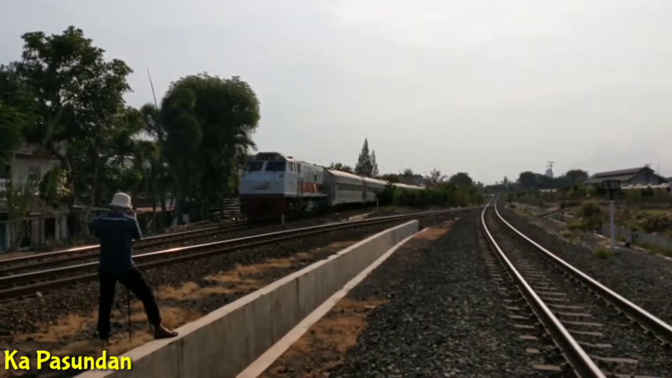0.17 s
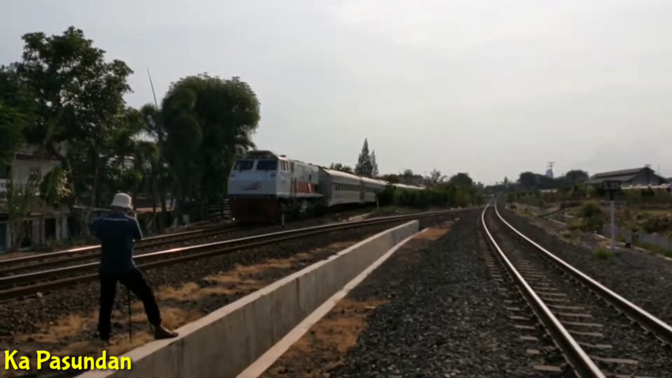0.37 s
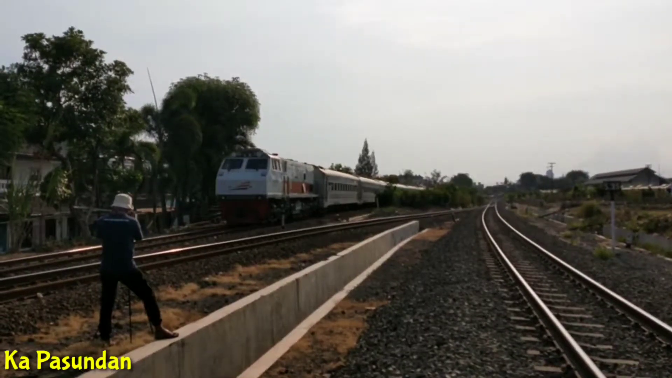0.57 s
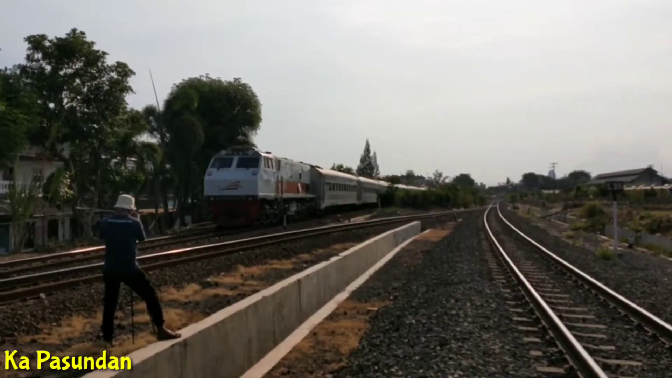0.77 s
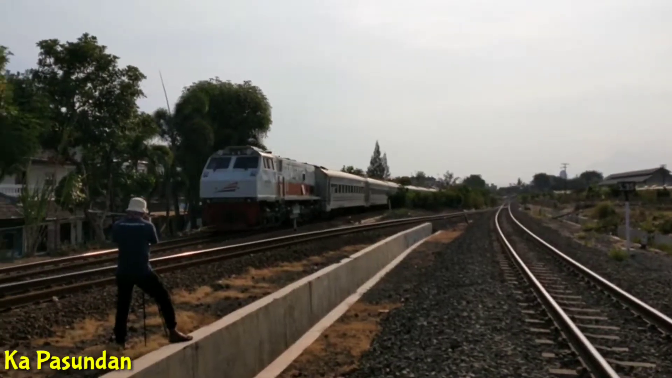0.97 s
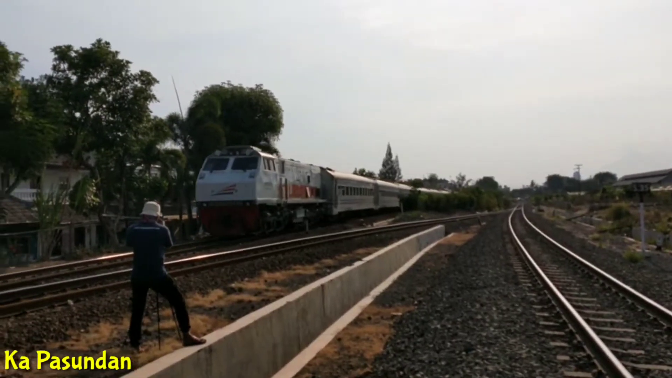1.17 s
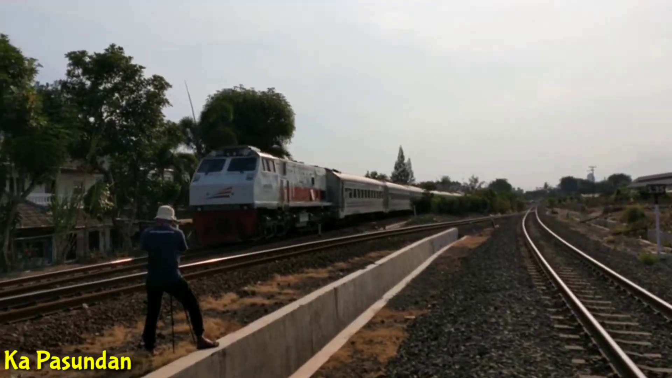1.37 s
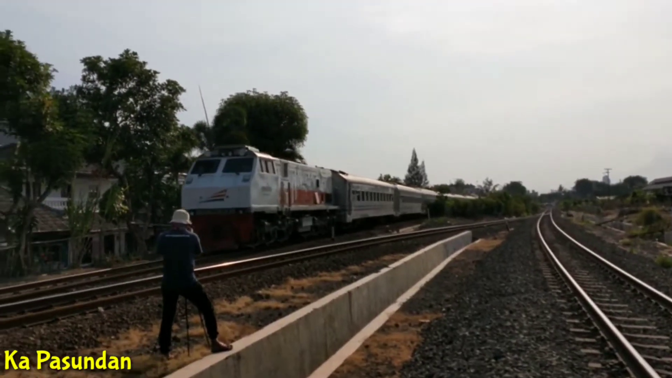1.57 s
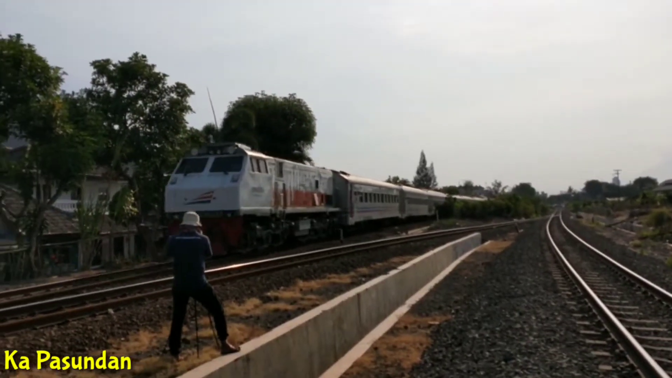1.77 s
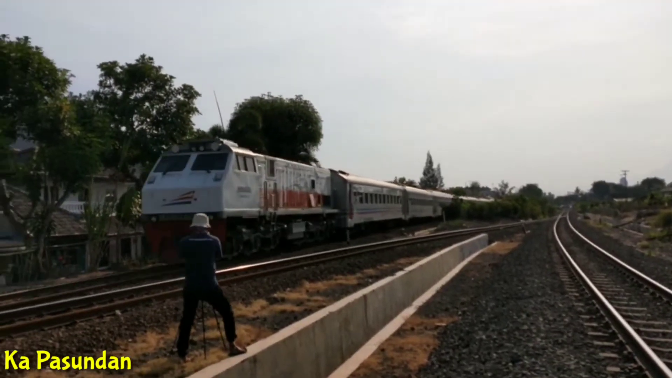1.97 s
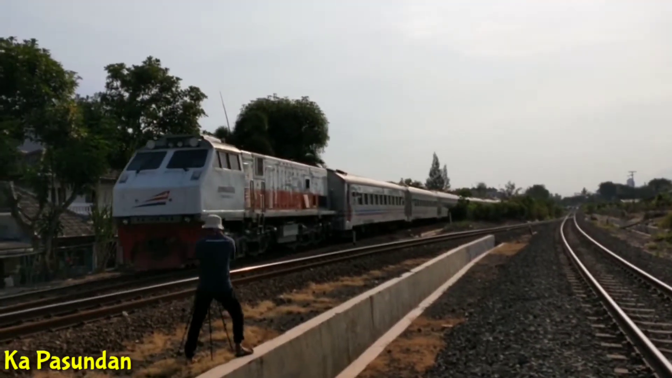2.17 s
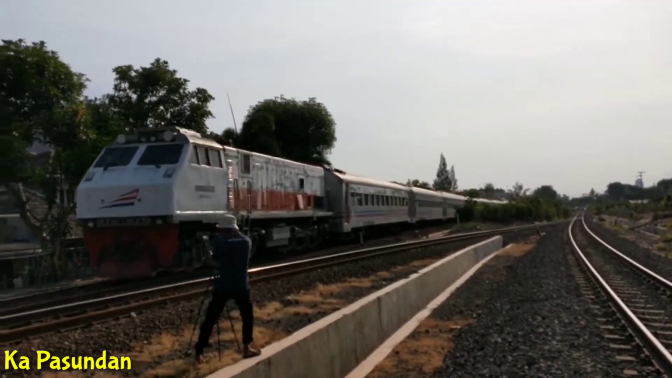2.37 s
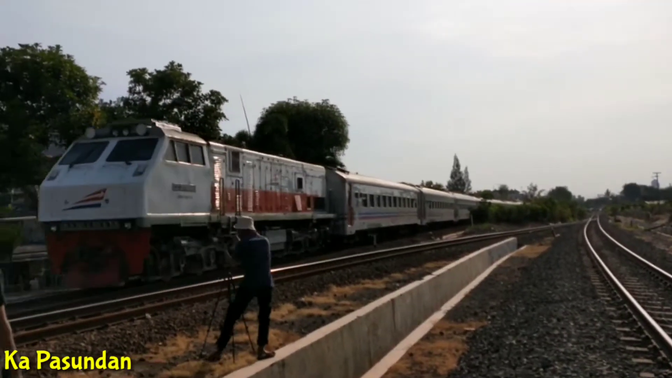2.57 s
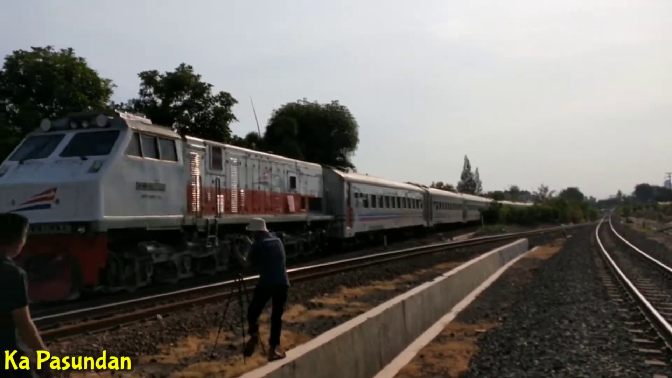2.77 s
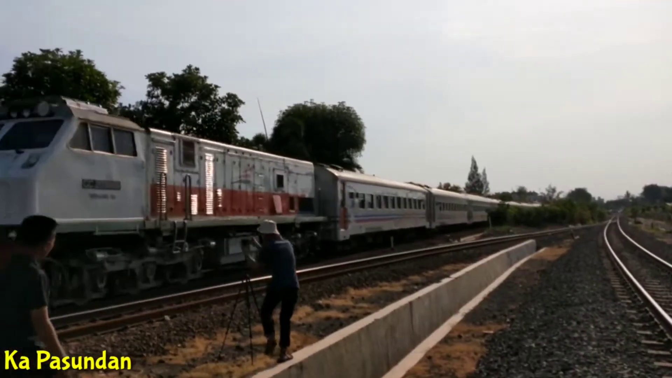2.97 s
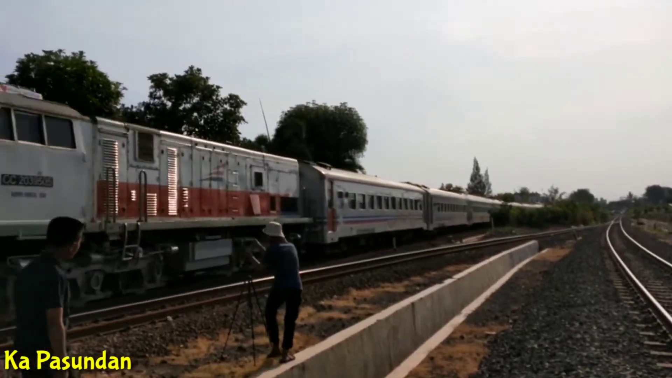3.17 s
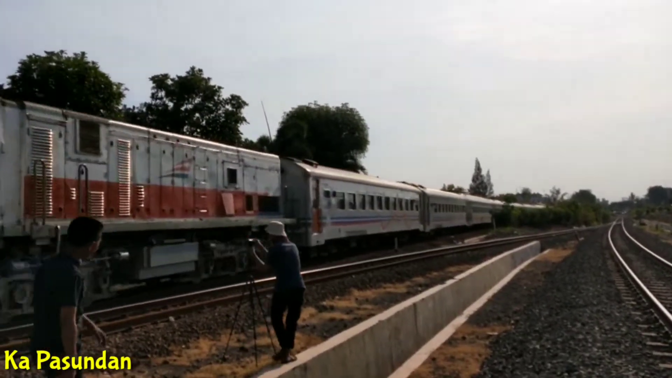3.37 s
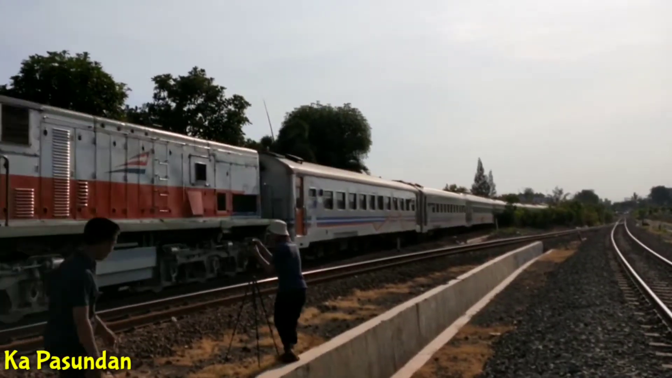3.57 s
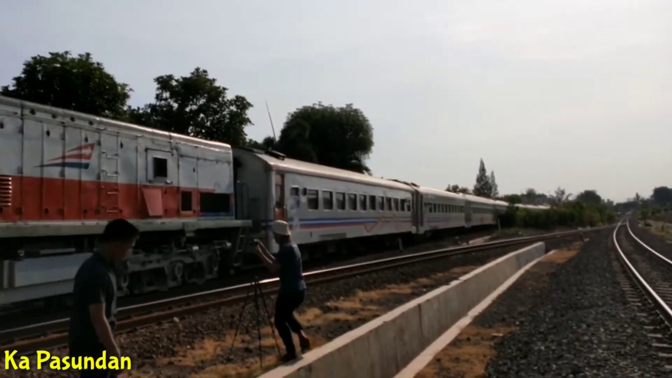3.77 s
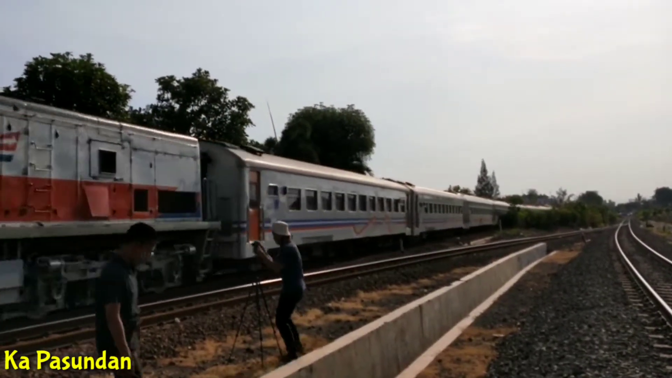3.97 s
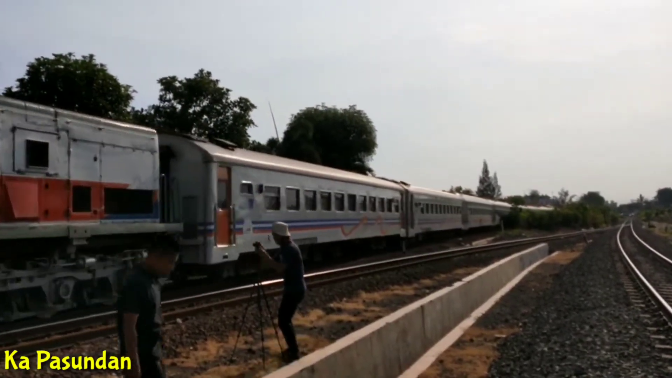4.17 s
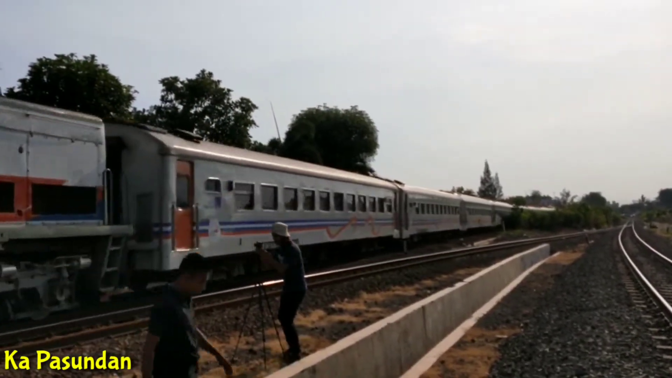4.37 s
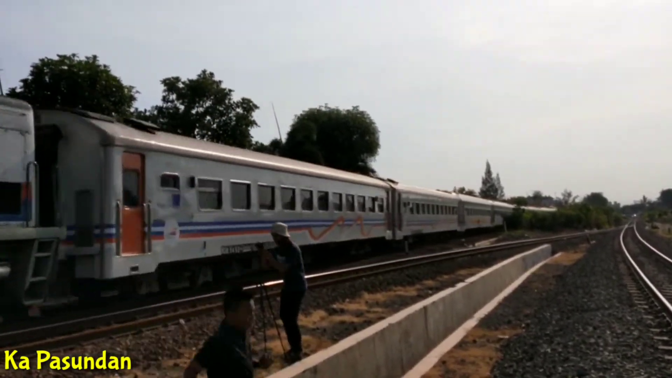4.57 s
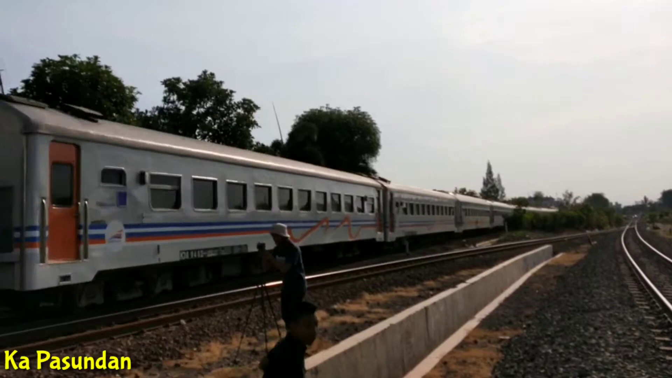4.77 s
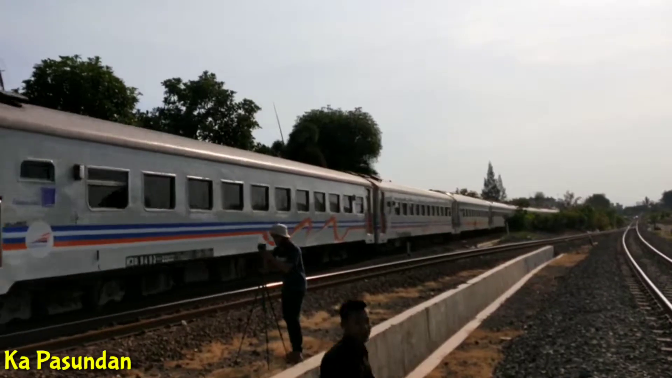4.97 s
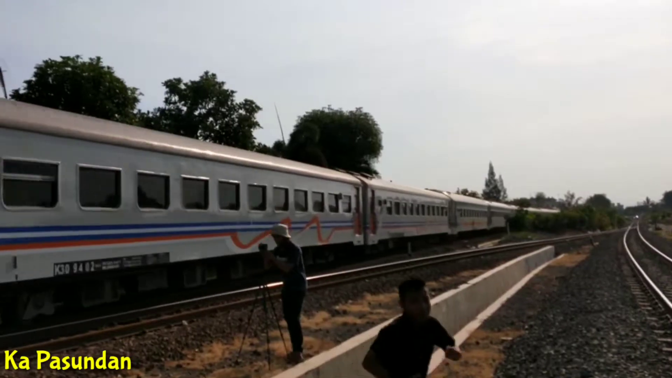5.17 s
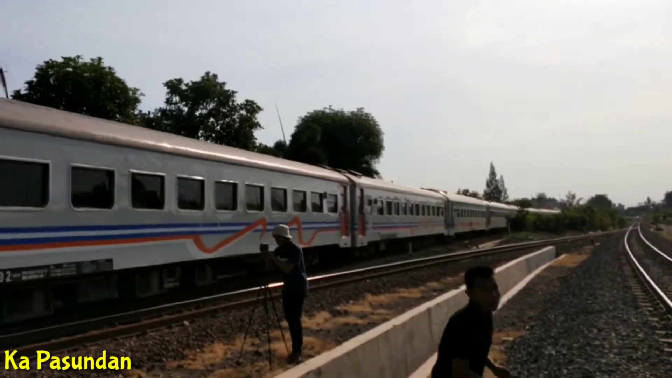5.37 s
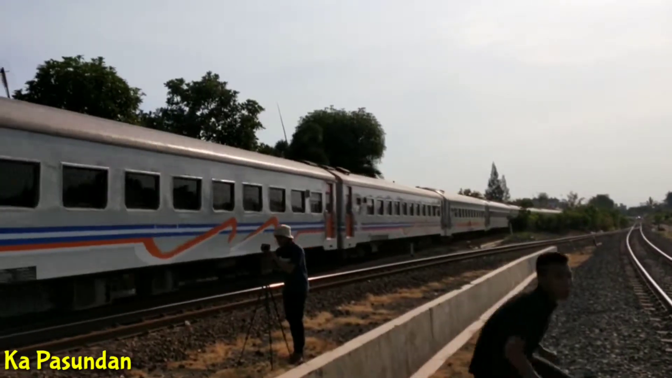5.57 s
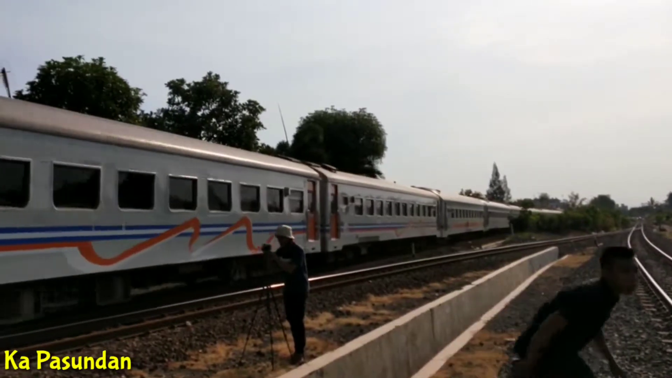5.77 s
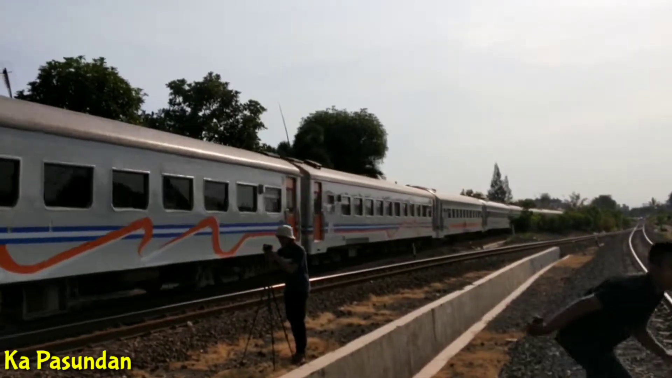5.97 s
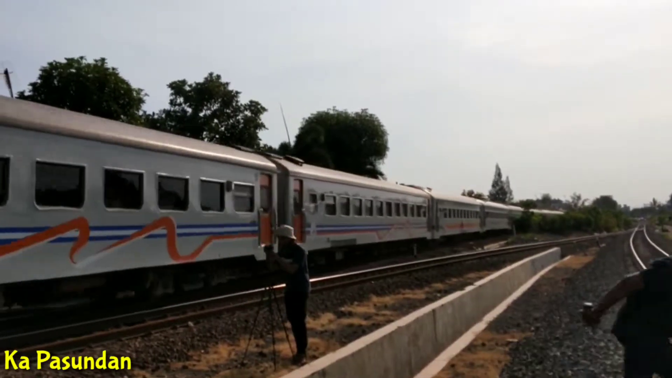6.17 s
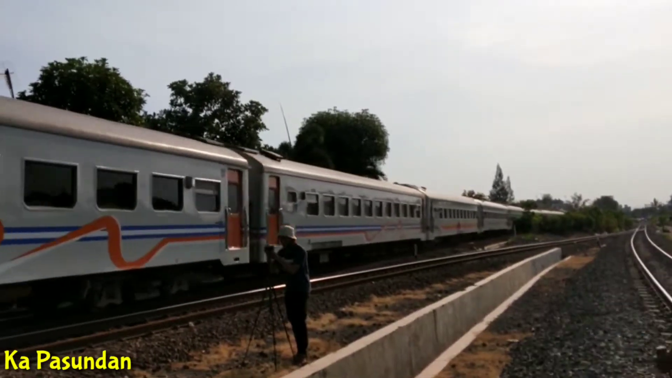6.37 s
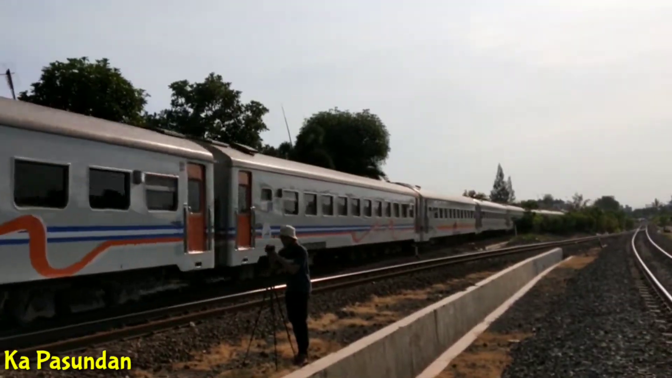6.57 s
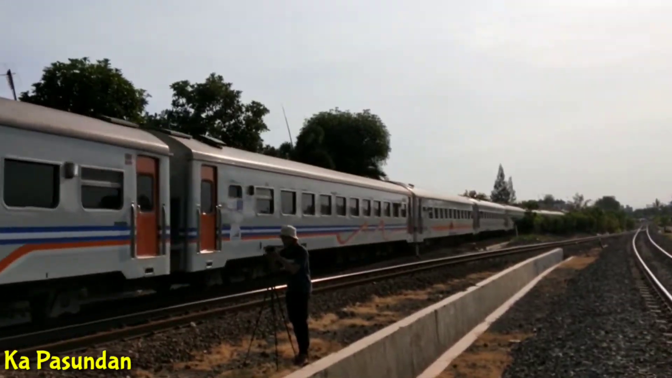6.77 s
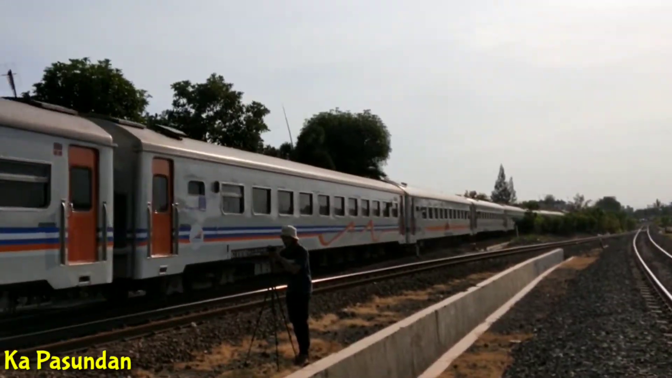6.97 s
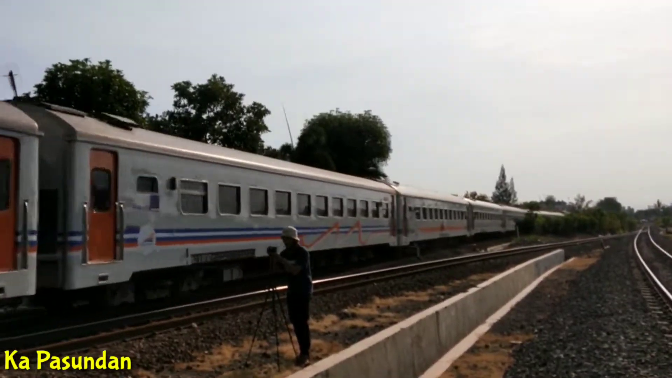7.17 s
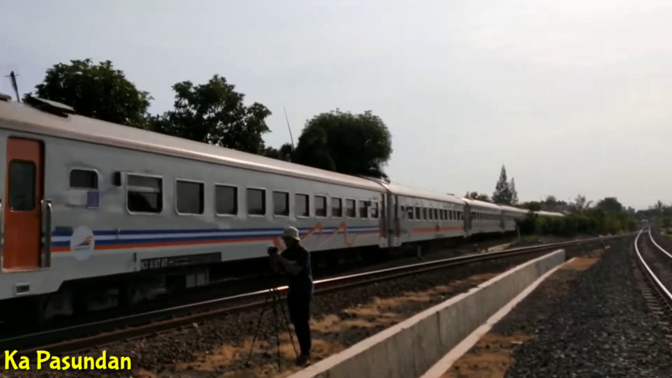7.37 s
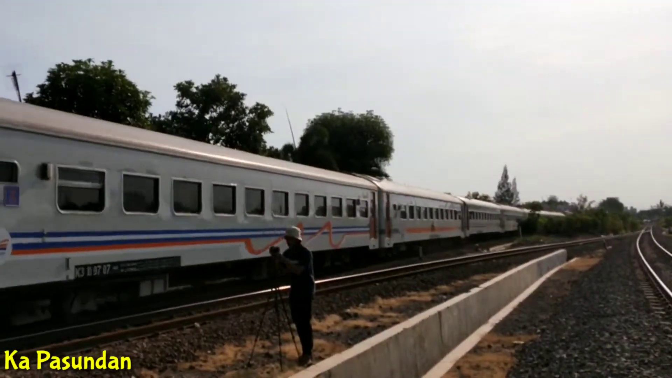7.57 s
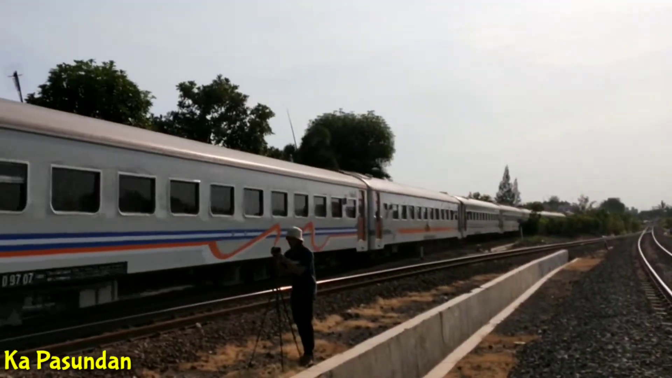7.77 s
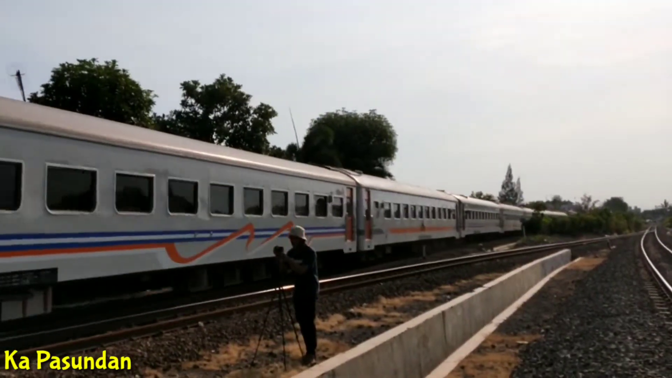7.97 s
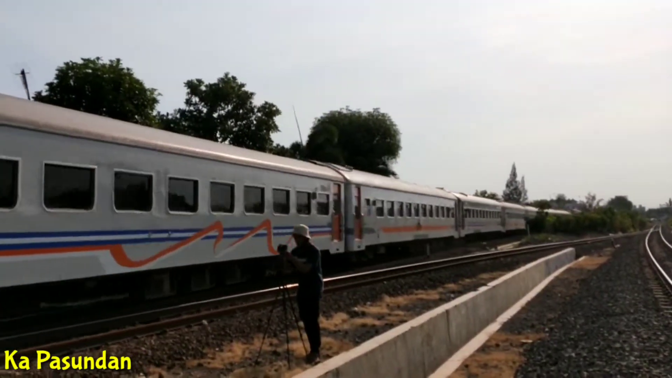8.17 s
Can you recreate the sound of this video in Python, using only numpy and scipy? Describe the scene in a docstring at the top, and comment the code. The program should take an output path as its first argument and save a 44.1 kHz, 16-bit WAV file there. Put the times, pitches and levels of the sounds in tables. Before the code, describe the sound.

A train approaches quietly from ahead, its low rumble punctuated by soft pounding. A single two-pitched, slightly beating horn blast cuts through, leaving a short outdoor echo. Rolling noise swells, then heavy wheels hammer rail joints very close by, irregular and metallic, with crunching ballast, ticks and flange hiss. The coaches keep clattering to the end, in waves. Open-air stereo pickup, brighter on the left.

```python
"""Diesel train passing with air horns

A diesel train comes in from ahead and sounds a chord of air horns once; houses and trees echo it.
Uneven firing pulses make the engine boom; shaped noise makes rail roar, wheel rush, hiss and draught.
Decaying modes ring bogies and wheel discs at rail joints; random grains chatter and crunch.
Gliding sines make faint rim squeals. The right microphone is much duller than the left."""
import sys
import numpy as np
from scipy import signal
from scipy.fft import rfft, irfft, next_fast_len
from scipy.io import wavfile
from scipy.ndimage import uniform_filter1d, map_coordinates

SR = 44100
rng = np.random.default_rng(int(sys.argv[2]) if len(sys.argv) > 2 else 0)


def pcm_store(signal):
    """Save signal as 16-bit PCM."""
    levels = np.round(np.clip(np.atleast_2d(signal), -1, 1) * 32767)
    wavfile.write(sys.argv[1], SR, levels.astype(np.int16).T)


N = 362061
TIME = np.arange(N) / SR
TOP_HZ = 15500


def undb(db):
    """Decibels to gain."""
    return 10 ** (np.asarray(db) / 20)


def unit(x):
    """Scale to rms 1."""
    return x / np.sqrt(np.mean(x ** 2))


def curve(rows):
    """Join (t/s, value) rows by straight lines."""
    return np.interp(TIME, *np.transpose(rows))


def at(points, hz):
    """Read (f/Hz, value) points on a log-frequency axis."""
    f, value = np.transpose(points)
    return np.interp(np.log(np.maximum(hz, 1)), np.log(f), value)


def outline(points, f):
    """Gain of a (f/Hz, level/dB) spectrum that falls away beyond its end points."""
    low_cut = np.minimum(f / points[0][0], 1)
    return undb(at(points, f)) * low_cut / (1 + (f / points[-1][0] / 2.0) ** 4)


def shape(x, response):
    """Filter by a gain that is a function of frequency."""
    size = next_fast_len(N + 8192)
    return irfft(rfft(x, size) * response(np.fft.rfftfreq(size, 1 / SR)), size)[..., :N]


def colour(x, points):
    """Give x a spectrum; rms 1."""
    return unit(shape(x, lambda f: outline(points, f)))


def walk(rate):
    """Smoothed random steps, about rate per second; rms 1."""
    size = max(int(SR / rate), 2)
    held = np.repeat(rng.standard_normal(N // size + 2), size)[rng.integers(size):]
    return unit(uniform_filter1d(uniform_filter1d(held, size), size)[:N])


# likeness of the two ports: f/Hz, likeness [0-1]
LIKENESS = [(60, 0.86), (130, 0.83), (300, 1), (640, 0.74), (1400, 0.92), (3000, 0), (15000, 0.0012)]


def wide_noise(points):
    """Noise from a long source: alike at both ports in the bass, unrelated in the treble; rms 1."""
    f = np.fft.rfftfreq(next_fast_len(N + 8192), 1 / SR)
    likeness = np.clip(at(LIKENESS, f), 0, .99)
    noise = rng.standard_normal((2, len(f))) + 1j * rng.standard_normal((2, len(f)))
    mid, side = np.sqrt([1 + likeness, 1 - likeness]) * noise
    return unit(irfft(np.array([mid + side, mid - side]) * outline(points, f))[:, :N])


def blows(rows, t60, rise):
    """Envelope of (t/s, level/dB) blows that swell quickly and die away; their powers add."""
    power, t = np.zeros(N + SR), TIME[:SR // 2]
    one = ((1 - np.exp(-t / rise)) * np.exp(-np.log(1000) * t / t60)) ** 2
    for s, db in rows:
        start = int(s * SR)
        power[start:start + len(t)] += undb(db) ** 2 * one
    return np.sqrt(power[:N])


def strikes(rows, modes, scatter_db, detune, push):
    """(t/s, level/dB) blows on a set of modes, mixed anew by each blow; a longer push is softer."""
    out, t = np.zeros(N + SR), TIME[:SR // 3]
    hz, db, t60 = np.transpose(modes)[:, :, None]
    for s, blow_db in rows:
        size, tune, turn = rng.standard_normal((3, len(modes), 1))
        decay = undb(db + scatter_db * size) * np.exp(-np.log(1000) * t / t60)
        rings = decay * np.sin(2 * np.pi * (hz * (1 + detune * tune) * t + turn))
        ring = rings.sum(0) * (1 - np.exp(-t / push))
        start = int(s * SR)
        out[start:start + len(t)] += undb(blow_db) * ring / ring[:SR // 40].std()
    return out[:N]


def grains(rate, spread_db):
    """Random tiny impacts, a few much harder than the rest; rms 1."""
    falls = (rng.random(N) < rate / SR) * rng.choice([-1, 1], N)
    return unit(falls * undb(spread_db * np.minimum(rng.exponential(size=N), 3)))


# exhaust spectrum: f/Hz, relative level/dB
EXHAUST = [(20, -27), (35, -21), (50, -14), (70, -6.5), (88, 1), (120, -5), (170, -9), (240, -11.5),
           (450, -29.5)]


def diesel(firing_hz=58, scatter_db=9.0, wash=2.0):
    """Uneven firings boom in the exhaust stack, over the low wash of the cooling fan."""
    turns = np.cumsum(firing_hz * (1 + .04 * walk(30))) / SR
    pulses = np.diff(np.floor(turns), prepend=0) * undb(scatter_db * rng.uniform(-1.3, 1, N))
    boom = colour(pulses - pulses.mean(), EXHAUST)
    return unit(boom + wash * wide_noise(EXHAUST)) * undb(1.2 * walk(9))


# brief swells of the boom: middle t/s, half length/s, level/dB
SWELLS = [(4.915, 0.09, -22.5)]
ABREAST_S, NEARBY_S = 3.98, 0.33
ENGINE_FAR_DB, ENGINE_NEAR_DB = -33, -26


def engine_gain():
    """The boom carries far, grows as the locomotive goes by and swells briefly."""
    close = undb(ENGINE_NEAR_DB) / np.hypot(1, (TIME - ABREAST_S) / NEARBY_S)
    swells = sum(undb(db) * np.exp(-((TIME - s) / half) ** 2) for s, half, db in SWELLS)
    return np.sqrt(undb(ENGINE_FAR_DB) ** 2 + close ** 2 + swells ** 2)


def roar_swell():
    """Rough patches of rail make the roar flutter: dB."""
    return 1.0 * walk(20)


# bogies on jointed, uneven track: start t/s, length/s, relative level/dB
CROSSINGS = [(1.288, 0.82, -40.5), (3.554, 0.074, -29), (3.77, 0.72, -17.5), (4.706, 0.69, -19),
             (5.45, .24, -26), (5.74, 0.18, -16), (6.07, 0.16, -21), (6.994, 0.16, -18.5),
             (7.245, 0.13, -20), (7.432, 0.36, -19.5), (7.82, 0.19, -25), (8.077, .2, -18.5)]
CROSSING_ATTACK_S, CROSSING_RELEASE_S = 0.044, 0.057


def crossing():
    """Gain of the shaking as bogies run onto uneven track: it builds, holds and dies away."""
    gain = np.zeros(N)
    for start, length, db in CROSSINGS:
        build = np.clip((TIME - start) / CROSSING_ATTACK_S, 0, 1)
        decay = np.exp(-np.maximum(TIME - start - length, 0) / CROSSING_RELEASE_S)
        gain += undb(db) * build * decay
    return gain


# rolling spectra of bogies, rails, wheels, rims, finest treble: f/Hz, relative level/dB
RUMBLE = [(25, -29), (40, -36), (60, -16.5), (110, -15), (165, -2.5), (230, -1), (325, 2.5), (400, -5),
          (500, -10.5), (620, -19), (1000, -32.5)]
ROAR = [(330, -7.5), (520, -1), (750, 3.5), (980, 1), (1300, -3), (1800, -15), (3000, -42)]
RUSH = [(900, -38), (1350, 3), (1600, 7.5), (1900, 6), (2150, 7), (2500, 1.5), (2800, -0.5), (3200, -3),
        (3900, -19.5), (5000, -48), (8000, -51)]
HISS = [(3000, -0.5), (4200, -3.5), (4900, 2), (5550, 6), (6200, -1.5), (7100, -8.5), (8500, -25),
        (12000, -28.5), (15000, -49)]
GRIT = [(6000, 7), (8000, -1), (10000, -1), (12000, -6), (13800, 3), (15300, -2)]


def rolling(roar_db, rush_db, rattle_db=2.5, rattle=0.62, hiss_slope=0.43, rumble_slope=1.573,
            grit_slope=1.21):
    """Rough treads shake bogies, rails and rims, more in a crossing; loose gear adds small knocks."""
    chance = rng.random((300, 2))
    knock_db = -rattle_db * np.log(0.035 + chance[:, 1])
    knocks = blows(zip(chance[:, 0] * TIME[-1], knock_db), t60=0.13, rise=0.0017)
    shake, uneven = 1 + rattle * (unit(knocks) - 1) / 2, crossing()
    # dB below each one's loudest moment; rumble follows the rails, hiss and grit the wheels
    rails, wheels = roar_db - roar_db.max(), rush_db - rush_db.max()
    rumble_gain = np.hypot(undb(-17.5 + rumble_slope * rails), undb(-2.0) * uneven)
    rumble = wide_noise(RUMBLE) * rumble_gain * undb(0.98 * walk(17))
    roar_gain = np.hypot(undb(roar_db + 2), undb(-18.5) * uneven)
    roar = wide_noise(ROAR) * roar_gain * undb(roar_swell())
    rush_gain = np.hypot(undb(rush_db - 1.0), undb(-25.0) * uneven)
    rush = wide_noise(RUSH) * rush_gain * undb(0.58 * walk(25))
    hiss = wide_noise(HISS) * undb(-39.0 + hiss_slope * wheels + 1.54 * walk(24))
    # the finest treble only carries from the nearest wheels
    grit = wide_noise(GRIT) * undb(-44.5 + grit_slope * wheels + 2.0 * walk(10))
    return rumble + shake * (roar + rush + hiss + grit)


def ground_dip(x, dip_hz=495, octaves=.22, depth=.5):
    """From far off, the reflection off the ballast weakens a band in the low middle."""
    far = np.clip((3.5 - TIME) / 0.5, 0, 1)

    def band(f):
        return depth * np.exp(-(np.log2(np.maximum(f, 1) / dip_hz) / octaves) ** 2)
    return x - far * shape(x, band)


# wheel disc modes: f/Hz, relative level/dB, t60/s at a joint (clatter damps them more)
WHEEL = [(1134, -18, 0.041), (1403, 8, 0.22), (1730, 6, 0.15), (1955, 5.5, 0.28), (2170, 8.5, 0.046),
         (2342, 3, 0.11), (2509, 5, 0.25), (2870, -8, 0.045), (3410, -2.5, 0.041)]
# steel on steel: f/Hz, relative level/dB
CLANK = [(300, 10), (600, 19.5), (950, 19.5), (1400, 9.5), (2400, 0.5), (3700, -7), (5500, -0.5),
         (8000, -16.5), (15000, -31)]
# track dips under a heavy bogie: middle t/s, half length/s, level/dB
DIPS = [(3.637, 0.067, -24.5), (3.822, 0.059, -21.5), (4.038, 0.025, -22.5), (4.72, 0.045, -25.5),
        (6.667, 0.022, -31), (7.075, 0.022, -26.5)]


def clatter(rush_db, chatter_db=-4):
    """Brake gear and couplings chatter on the wheels; ballast and loose plates crunch in track dips."""
    t = TIME[:SR // 4]
    hz, db, t60 = np.transpose(WHEEL)[:, :, None]
    chatter = np.zeros((2, N))
    for wheel in range(4):
        tune, turn = rng.standard_normal((2, len(WHEEL), 1))
        decay = undb(db) * np.exp(-np.log(1000) * t / (t60 * 0.2))
        ring = (decay * np.sin(2 * np.pi * (hz * (1 + 0.018 * tune) * t + turn))).sum(0)
        chatter[wheel % 2] += signal.fftconvolve(grains(rate=40, spread_db=2.5), ring)[:N]
    dips = sum(undb(level) * np.exp(-((TIME - s) / half) ** 2) for s, half, level in DIPS)
    stones = grains(rate=900, spread_db=2.0)  # shared by both ports
    plates = [0.98 * grains(rate=1100, spread_db=8.5) for _ in range(2)]
    crunch = colour(stones + np.array(plates), CLANK)
    return unit(chatter) * undb(rush_db + chatter_db) + dips * crunch


# flanges rubbing the rail in the curve: middle t/s, half length/s, hiss level/dB
RUBS = [(0.647, 0.087, -46), (3.01, 0.13, -46), (4.194, 0.24, -38.5), (4.81, 0.24, -41.5),
        (5.674, 0.056, -37), (5.856, 0.042, -37), (6.713, 0.039, -40), (6.852, 0.037, -43),
        (7.015, .016, -39)]


def rubbing():
    """Gain of the flange hiss: each rub swells and fades."""
    return sum(undb(db) / (1 + ((TIME - s) / half) ** 2) for s, half, db in RUBS)


# faint rim squeals: start t/s, length/s, first f/Hz, last f/Hz, relative level/dB
SQUEALS = [(5.6, .15, 5500, 5520, -49), (6.27, .22, 5635, 5610, -46), (6.54, .055, 5770, 5750, -46),
           (6.52, .42, 5610, 5585, -45), (6.665, .08, 5570, 5600, -38), (6.8, .11, 5605, 5590, -44),
           (6.995, .04, 5780, 5760, -44), (7.912, .028, 2560, 2460, -34)]


def rim_song():
    """Rubbing flanges hiss; rim modes swell, glide a little and fade."""
    song = np.zeros(N)
    waver, fits = 1 + .0013 * walk(300), undb(2 * walk(60))
    for s, length, from_hz, to_hz, db in SQUEALS:
        on = (TIME > s) & (TIME < s + length)
        along = (TIME[on] - s) / length
        turns = np.cumsum((from_hz + (to_hz - from_hz) * along) * waver[on]) / SR
        song[on] += undb(db) * np.sqrt(np.sin(np.pi * along)) * np.sin(2 * np.pi * turns)
    return song * fits + rubbing() * undb(2.0 * walk(30)) * wide_noise(HISS)


# heavy wheels pounding track far ahead: t/s, boom level/dB, clank level/dB
THUMPS = [(1.01, -27, -42), (1.085, -39, -34), (1.146, -26.5, -41), (1.277, -25, -45), (1.315, -26, -38),
          (1.36, -26.5, -43), (1.515, -20, -51)]


def thumps():
    """The locomotive pounds the track while still far ahead: dull booms with a faint clank."""
    dull = wide_noise([(50, -13), (90, 3), (130, 2.5), (170, -4.0), (240, -9), (340, -16.5), (450, -37)])
    boom = blows([(s, db) for s, db, _ in THUMPS], t60=0.31, rise=0.0039) * dull
    return boom + blows([(s, db) for s, _, db in THUMPS], t60=0.23, rise=0.0061) * wide_noise(CLANK)


# metallic ticks of track and running gear: t/s, relative level/dB, relative top treble level/dB
TICKS = [(1.084, -32.5, -69.5), (1.328, -34.5, -64), (2.829, -46, -53), (4.0322, -29, -44),
         (4.115, -20.5, -38), (4.511, -21.5, -52.5), (4.864, -19, -39), (5.5408, -30, -33.5),
         (6.8069, -30, -41), (7.2649, -23.5, -42)]
# tick spectrum: f/Hz, relative level/dB
TICK = [(1500, -47), (3000, 7), (4000, -2.5), (5500, 11), (7000, -6), (9000, -37), (15000, -36)]


def ticks(tick_db=-7, top_db=-2):
    """Small bits of steel and stone touch; some are much brighter than others."""
    body = blows([(s, db + tick_db) for s, db, _ in TICKS], t60=0.12, rise=0.0012)
    top = blows([(s, db + top_db) for s, _, db in TICKS], t60=0.19, rise=0.0015)
    return body * wide_noise(TICK) + top * wide_noise(GRIT)


KNOCKS_PER_S, KNOCK_SPREAD_DB = 8, 5.5  # rate before the weakest are dropped; +- spread


def axle_knocks():
    """(t/s, level/dB) of the lighter blows: they fall at random, as strong as the bogies shake."""
    chance = rng.random((int(KNOCKS_PER_S * TIME[-1]), 2))
    index = (chance[:, 0] * (N - 1)).astype(int)
    db = 20 * np.log10(crossing()[index] + 1e-6) + KNOCK_SPREAD_DB * (2 * chance[:, 1] - 1)
    return [(s, level) for s, level in zip(TIME[index], db) if level > -50]


# hardest rail joint blows: t/s, relative levels/dB of thud, clank, disc ring and crack
JOINTS = [(3.603, -23.5, -24, -32.5), (3.623, -6, -36, -29), (3.815, -14, -26, -37), (3.865, -4, -36, -34),
          (3.945, -6, -39, -51), (4.026, 1, -20, -36), (4.16, -6, -18.5, -28), (4.214, -2.5, -20, -24),
          (4.251, -3, -22, -32), (4.321, -7, -40, -32.5), (4.427, -2, -23, -28), (4.554, -10, -34, -43),
          (4.615, -7.5, -35, -25), (4.697, -6, -24, -29), (4.789, 0.5, -36, -44), (4.836, -5.5, -25, -36),
          (4.883, -2, -19.5, -28), (4.996, -8, -28, -44.5), (5.054, -9, -20, -41), (5.107, -4, -23, -21.5),
          (5.152, -4, -37, -39), (5.192, -20, -35, -25.5), (5.245, -4, -32, -26), (5.298, -3.5, -22, -25.5),
          (5.468, -7.5, -30.5, -27.5), (5.525, -19.5, -37, -38), (5.612, -9.5, -24, -33),
          (5.755, -3.5, -38, -47), (5.798, 0, -26.5, -33), (5.885, -10.5, -41, -42),
          (5.991, -2.5, -21, -24), (6.059, 0.5, -21.5, -34.5), (6.165, -16, -38, -53),
          (6.243, -9, -26.5, -26), (6.359, -12.5, -31, -42), (6.926, -7.5, -29, -40.5),
          (7.0, -9.5, -22, -29), (7.039, -10, -27.5, -41), (7.214, -4, -24, -33), (7.26, -13, -22.5, -31.5),
          (7.41, -1, -25.5, -39), (7.459, 0, -20, -34), (7.524, -5, -29, -32), (7.572, -3, -32, -28.5),
          (7.656, -2.5, -22.5, -30), (7.722, -3, -23.5, -32), (7.832, -12.5, -25.5, -40),
          (7.912, -6, -36, -27.5), (7.961, -7.5, -28, -45), (8.105, -16, -23.5, -34)]
# bogie, rail and sleeper modes: f/Hz, relative level/dB, t60/s
BOGIE = [(82.5, -11.5, 0.13), (153.7, 1, 0.19), (194.7, -7, 0.41), (224, 2, 0.057), (276.5, 1, 0.15),
         (309.5, 2.5, 0.15), (346.5, 2, 0.24), (372, -6, 0.19), (401.6, -3, 0.22), (463, -9, 0.26)]


def joints(thud_db=-11.5, clank_db=-1, crack_db=-1, ring_db=-8, knock_thud_db=-1.0, knock_clank_db=-16):
    """Wheels drop into the gap: bright crack, steel clank, thud of bogie and sleeper, ringing disc."""
    light = axle_knocks()
    thud_rows = [(s, db + thud_db) for s, db, _, _ in JOINTS]
    thud_rows += [(s, db + knock_thud_db) for s, db in light]
    thuds = strikes(thud_rows, BOGIE, scatter_db=4, detune=0.03, push=0.0024)
    clank_rows = [(s, db + clank_db) for s, _, db, _ in JOINTS]
    clank_rows += [(s, db + knock_clank_db) for s, db in light]
    clanks = blows(clank_rows, t60=0.17, rise=0.002)
    cracks = blows([(s, db + crack_db) for s, _, _, db in JOINTS], t60=.13, rise=.002)
    ring_rows = [(s, db + ring_db) for s, _, _, db in JOINTS]
    rings = strikes(ring_rows, WHEEL, scatter_db=9, detune=0.0208, push=0.00084)
    return thuds + clanks * wide_noise(CLANK) + rings + cracks * wide_noise(RUSH)


# pitch as the air pressure settles: t/s, ratio (each horn raises it to its own power)
HORN_BEND = [(1.65, 1.0), (1.77, 1.013), (1.83, 1.005), (1.92, 1.0), (2.2, .999), (2.4, .999), (2.5, 1.005),
             (2.56, 1.011), (2.65, 1.008)]
# blast overshoots as the valve opens, then wavers: t/s, relative level/dB
HORN_LEVEL = [(1.72, 0), (1.86, 1.2), (1.96, -0.8), (2.12, 0.7), (2.22, -1.4), (2.31, 0.3), (2.46, -1.0)]
# ground bounce, later as the horn nears: t/s, lag/s
GROUND_LAG = [(1.5, .0014), (2.14, .0018), (3, .0023)]
# strength of the bounce: f/Hz, share [0-1]
GROUND_SHARE = [(420, 0), (830, .38), (1700, .45), (5000, .3)]
STALL_S, FLUTTER_PER_S, FLUTTER_DB = 2.685, 28, 3.2


def horn(hz, bell, opens, shuts, attack, release, bend, sag, bloom=0.97):
    """A diaphragm chops the air, overtones last in and first out; [ahead with ground bounce, sideways]."""
    out, on = np.zeros((2, N)), (TIME > 1.5) & (TIME < 3)
    t = TIME[on]
    turns = np.cumsum(hz * curve(HORN_BEND) ** bend * (1 + .0016 * walk(400)))[on] / SR
    turns -= np.interp(2.155, t, turns)  # overtones 1 and 2 in phase here
    pressure = np.clip((t - opens) / attack, 0, 1) * np.exp(-np.maximum(t - shuts, 0) / release)
    pressure *= np.interp(t, [1.74, 1.8], [1, 1 - sag])
    pressure *= np.clip((STALL_S - t) / 0.013, 0, 1)  # diaphragm stalls when the pipe is nearly empty
    lag = curve(GROUND_LAG)[on]
    knots = np.arange(t[0], t[-1], 1 / FLUTTER_PER_S)
    blast = undb(curve(HORN_LEVEL) + .6 * walk(30))[on]
    for k in range(1, int(TOP_HZ / hz)):
        share = at(GROUND_SHARE, k * hz)
        comb = unit(np.sqrt(1 + share ** 2 + 2 * share * np.cos(2 * np.pi * k * hz * lag)))
        # moving air makes the higher overtones flutter, each on its own
        waver = np.interp(t, knots, rng.standard_normal(len(knots)))
        flutter = undb(FLUTTER_DB * min(k / 10, 1) * waver)
        swell = pressure ** (max(k - .5, 1) ** bloom)
        tone = undb(at(bell, k)) * swell * np.sin(2 * np.pi * (k * turns + (k > 2) * rng.random()))
        brassy = blast ** (k ** (1 / 4))  # a harder blast is brighter
        out[:, on] += tone * flutter * brassy * np.array([comb, np.ones_like(comb)])
    return np.sqrt(2) * out


# echo strength: f/Hz, relative level/dB
ECHO = [(310, -16), (420, -12), (830, -7), (1250, -7), (2100, -1.5), (5500, 0), (8000, -4), (15000, -5)]
FLAT_LEAST, FLAT_MOST = .003, .04  # share of the pitch
ECHO_LAG_S, PORT_LAG_S = .04, .0004  # spread of lag; scale of the lag between ports


def house_fronts(x, count=28):
    """The horn heads only slantwise for the houses: echoes come back flat and throb against it."""
    out, on = np.zeros((2, N)), (TIME > 1.6) & (TIME < 3)
    t = TIME[on]
    for i, (slant, far, side, sign) in enumerate(rng.random((count, 4))):
        flat = FLAT_LEAST + (FLAT_MOST - FLAT_LEAST) * ((i + slant) / count) ** 2
        lag = ECHO_LAG_S * far + flat * (t - t[0])
        for port, way in enumerate((-1, 1)):
            heard = t - lag + way * (side - .5) * PORT_LAG_S
            out[port, on] += np.sign(sign - .5) * np.interp(heard, TIME, x)
    return shape(out / np.sqrt(count), lambda f: undb(at(ECHO, f)))


def surroundings(x, t60, delay):
    """Scattered echoes from trees, fronts and ballast; the treble dies first."""
    t = TIME[:SR]
    tail = rng.standard_normal((2, SR)) * (1 - np.exp(-t / delay)) * np.exp(-np.log(1000) * t / t60)
    dull = signal.sosfilt(signal.butter(1, 2600, fs=SR, output="sos"), tail)
    tail = dull + (tail - dull) * np.exp(-t / 0.003)
    return signal.fftconvolve(x[None], tail / np.sqrt(np.sum(tail ** 2) / 2), axes=1)[:, :N]


# horn bells: overtone multiple, relative level/dB
LOW_BELL = [(1, 3), (2, -7.5), (3, -16), (4, -13.5), (5, -16.5), (6, -25), (7, -26.5), (10, -37.5),
            (17, -26.5), (24, -52)]
HIGH_BELL = [(1, -5), (2, -6), (3, -12), (4, -22), (5, -22), (6, -30.5), (7, -31), (8, -27), (9, -34),
             (10, -33.5), (11, -27), (12, -28), (13, -25), (14, -28), (17, -41.5), (20, -47.5), (28, -54),
             (37, -53)]
# port balance of sound from ahead: f/Hz, left minus right level/dB
AHEAD = [(300, -3.5), (600, -2.5), (850, 2), (1250, -5.5), (1700, -2.5), (15000, -2)]
LOW_HZ, MATE_HZ, HIGH_HZ = 317, 312, 416.2  # before bend; the low two beat


def horns(echo_db=-18):
    """The low pair speaks first and sags as the bright high horn takes its air; surroundings answer."""
    low = undb(-21.5) * horn(LOW_HZ, LOW_BELL, opens=1.65, shuts=2.48, attack=0.071, release=0.07,
                             bend=1.7, sag=.1)
    mate = undb(-24.0) * horn(MATE_HZ, LOW_BELL, opens=1.654, shuts=2.48, attack=0.075, release=0.13,
                              bend=0, sag=.1)
    high = undb(-14.0) * horn(HIGH_HZ, HIGH_BELL, opens=1.724, shuts=2.455, attack=0.066, release=0.15,
                              bend=.9, sag=0)
    ahead, sideways = low + mate + high
    direct = np.array([ahead, np.roll(ahead, 3)])  # left port first
    direct = shape(direct, lambda f: undb(np.array([at(AHEAD, f), -at(AHEAD, f)]) / 2))
    echoes = house_fronts(sideways)
    scattered = surroundings(sideways + echoes[0], t60=0.65, delay=0.026)
    return direct + echoes + undb(echo_db) * scattered


def horn_air(air_db=-35):
    """Compressed air rushes unevenly through the bells while the valve is open."""
    valve = curve([(1.71, 0), (1.82, 1), (2.42, 1), (2.52, .25), (2.62, 0)])
    blast = valve * undb(2 * curve(HORN_LEVEL) + 1.5 * walk(35))
    air = wide_noise([(250, -8), (365, 11), (500, -8), (900, -5), (1500, -7), (2700, -16), (4000, -19),
                      (5500, -7), (7500, -28), (15000, -47)])
    return undb(air_db) * blast * air


# draught spectrum: f/Hz, relative level/dB
DRAUGHT = [(25, -10), (45, 17), (70, 14), (140, -30), (250, -35)]


def draught(draught_db=-40.5, builds_s=1.4):
    """Air dragged by the coaches buffets the microphones once the locomotive is abreast."""
    build = np.clip((TIME - ABREAST_S) / builds_s, 0, 1)
    return wide_noise(DRAUGHT) * build * undb(draught_db + 2 * walk(4.7))


# brief scratch close on the right: t/s, level/dB
SCRATCH = [(7.1, -23), (7.128, -29)]


def scratch():
    """Two short bursts of bright noise, much weaker at the left port."""
    noise = wide_noise([(1500, 7), (3000, 4.5), (7000, -2), (11000, -6), (14000, -20)])
    return blows(SCRATCH, t60=0.1, rise=0.00091) * noise * np.array([[.15], [1]])


# microphone pair: f/Hz, left minus right level/dB
EARS = [(60, 0.7), (200, -.5), (380, 1), (700, 0.3), (1290, 5), (2380, 11), (3300, 14.7), (4200, 20.7),
        (5700, 25), (7500, 15.8), (10000, 2.66), (12500, 7.94), (15000, 20)]


def ports(x):
    """The right microphone loses treble; the sum of both keeps its level."""
    def response(f):
        ratio, likeness = undb(at(EARS, f)), np.clip(at(LIKENESS, f), 0, 1)
        gains = np.array([ratio, np.ones_like(f)])
        return 2 * gains / np.sqrt(1 + ratio ** 2 + 2 * likeness * ratio)
    return shape(x, response)


# rolling noise far off, then close: t/s, relative rail roar level/dB, relative wheel rush level/dB
FAR = [(0.0, -50.5, -59.5), (0.676, -47, -51), (0.794, -50, -57.5), (1.13, -49, -55), (1.55, -46.5, -56)]
NEAR = [(2.75, -42, -47.5), (2.9, -40, -52), (3.4, -38.5, -46), (3.73, -35, -48), (3.85, -31.5, -33),
        (4.0, -31.5, -35), (4.42, -32.5, -31.5), (5.27, -33, -35), (5.47, -36.5, -37), (5.9, -35.5, -36.5),
        (6.46, -38.5, -41.5), (6.62, -37.5, -39), (6.93, -38, -37.5), (7.16, -37, -36.5), (7.52, -35, -35),
        (8.21, -37.5, -41)]


def scene():
    """The train leans left while far off; alongside, it reaches the right port slightly earlier."""
    chord = horns() + horn_air()
    passage = np.vstack([FAR, NEAR])
    roar_db, rush_db = [np.interp(TIME, passage[:, 0], column) for column in passage.T[1:]]
    train = diesel() * engine_gain() + draught()
    train = train + ground_dip(rolling(roar_db, rush_db) + thumps())
    train = train + clatter(rush_db) + ticks() + rim_song() + joints()
    pan_db = curve([(0, 3), (1.3, 5.5), (2.2, -0.5), (2.8, -0.5), (5.5, -0.5), (6.7, 2.5), (8.21, -0.5)])
    lag_samples = curve([(0, -3), (3.2, -3), (3.8, 9), (8.21, 12)])  # left behind right
    left = map_coordinates(train[0], [np.arange(N) - lag_samples], order=3)
    train = np.array([left, train[1]]) * undb(np.array([pan_db, -pan_db]) / 2)
    return ports(train + chord) + scratch()


def record(dry):
    """Round the very highest peaks, then cut the top with a steep low-pass."""
    rounded = dry / (1 + (dry / .88) ** 8) ** (1 / 8)
    return signal.sosfilt(signal.ellip(10, .2, 80, TOP_HZ, fs=SR, output="sos"), rounded)


dry = scene()
out = record(dry)
pcm_store(out)
```